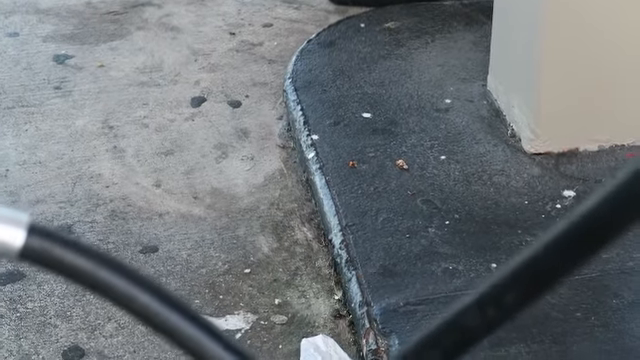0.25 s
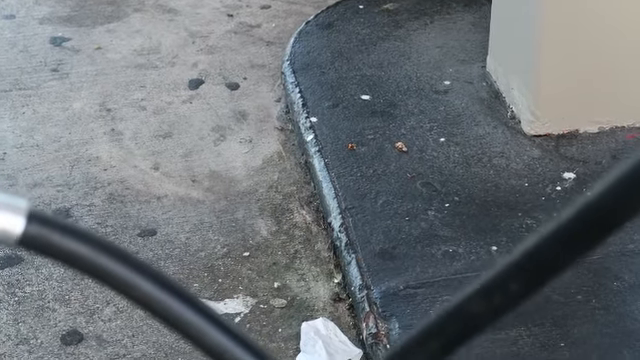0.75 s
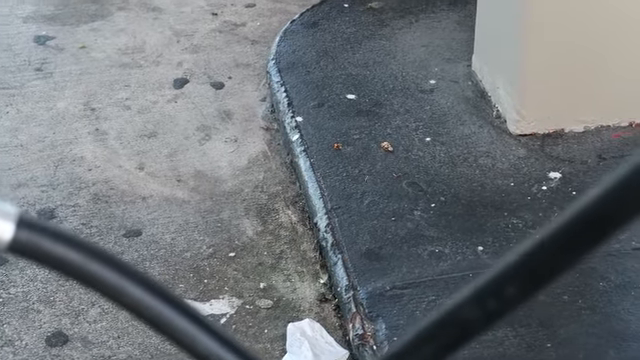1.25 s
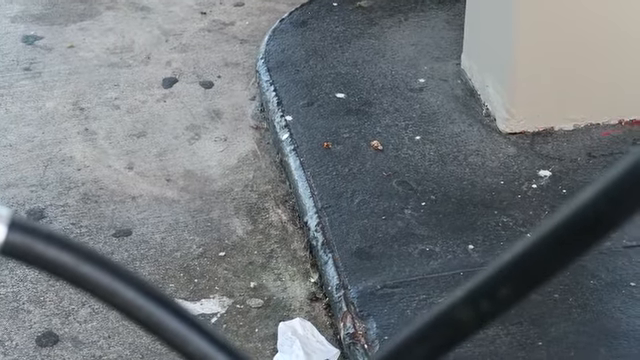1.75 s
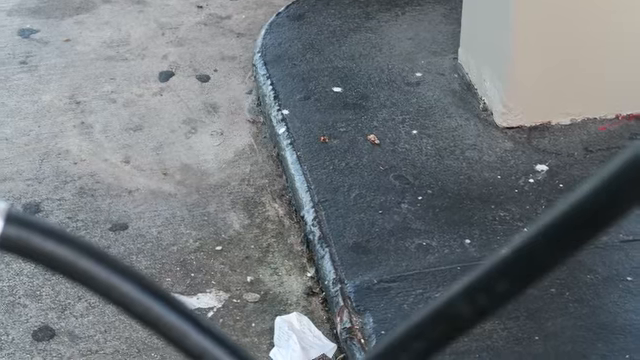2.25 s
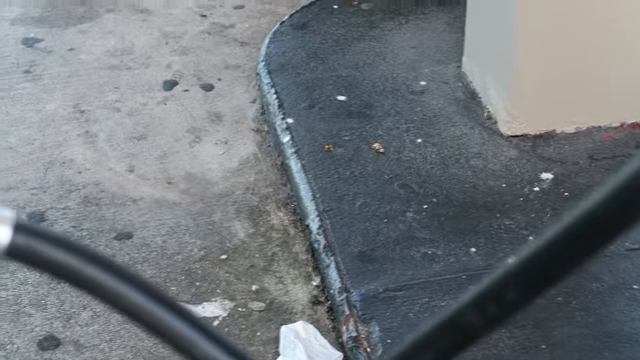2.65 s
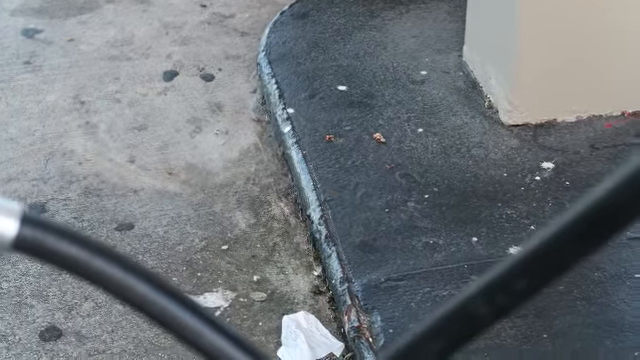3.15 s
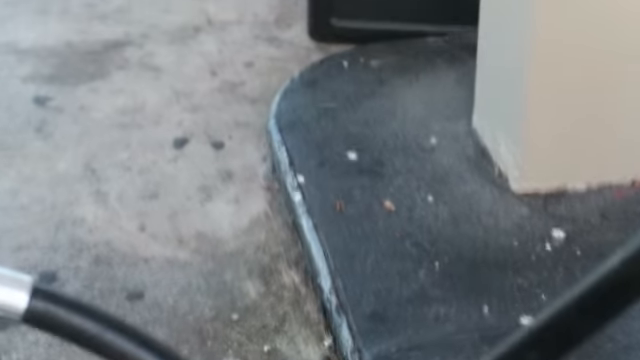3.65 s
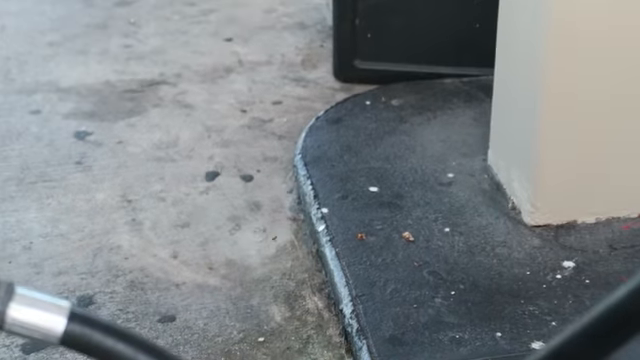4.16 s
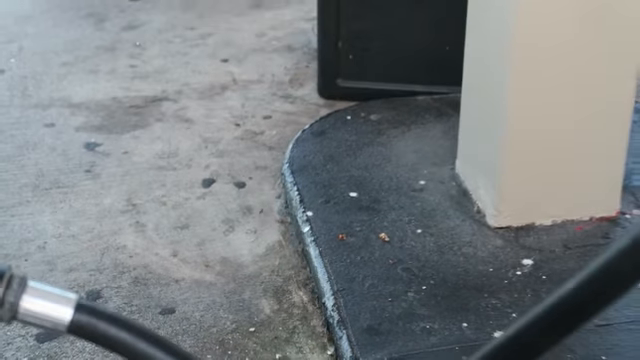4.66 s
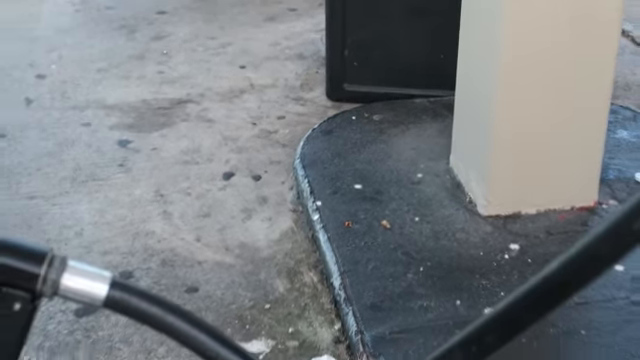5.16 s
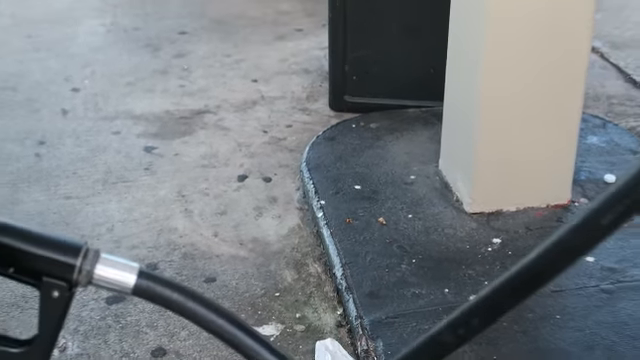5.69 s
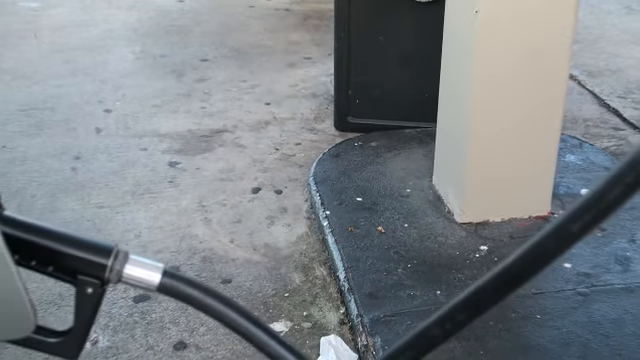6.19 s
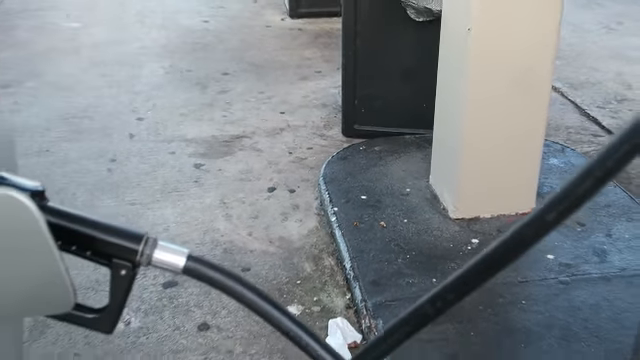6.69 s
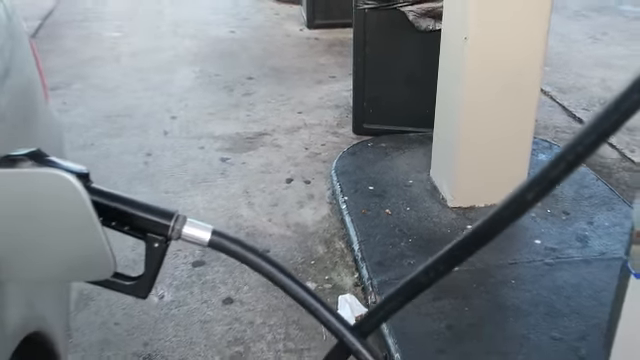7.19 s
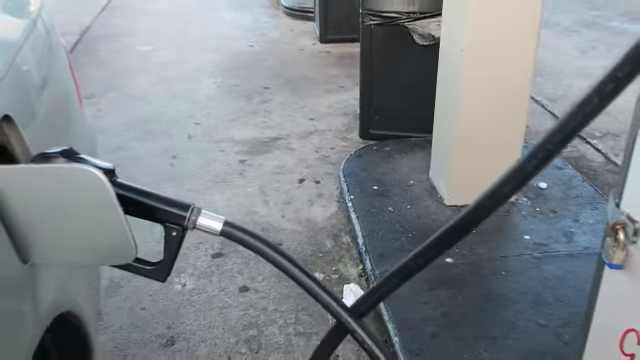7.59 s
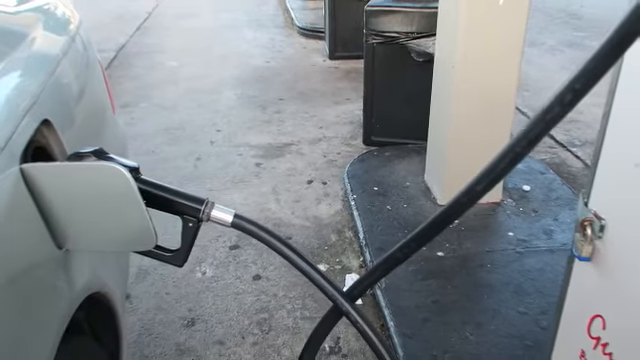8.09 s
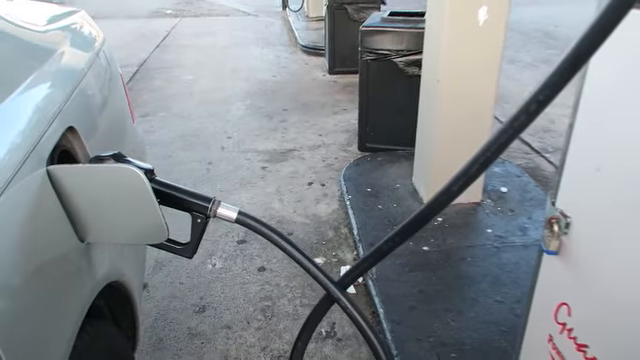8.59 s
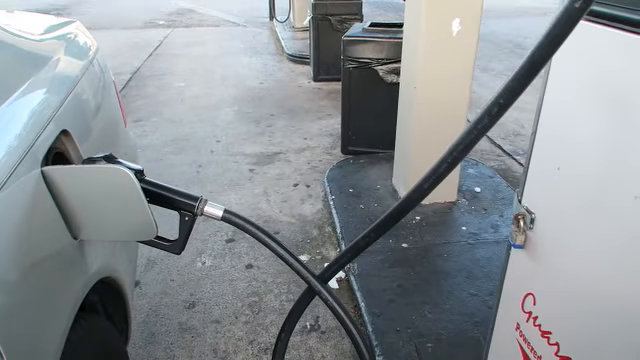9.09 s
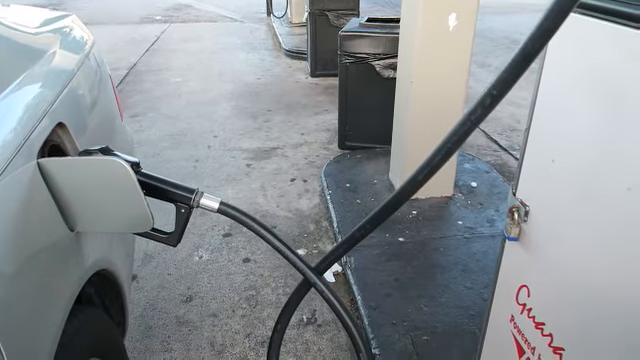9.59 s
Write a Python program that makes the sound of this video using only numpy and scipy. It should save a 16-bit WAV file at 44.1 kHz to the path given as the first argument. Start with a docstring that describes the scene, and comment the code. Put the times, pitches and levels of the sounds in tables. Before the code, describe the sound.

Broad, dull rush of flow and road noise, deep rumble and wavering engine hum; a faint early squeak, later a sudden close metal clack.

```python
"""Fuel runs into a car on a forecourt: a broad rush of flow and road traffic, made of flickering noise bands.
Over it a thin top band of noise flickers, below it lie a deep rumble and roar and faint gliding sine hums.
An engine drones on three multiples of its cycle rate, which drops twice and creeps up again.
A faint blurred squeak, a trembling tone, comes early on.
Once a small metal part clicks, rattles and rings: bursts of noise and decaying modes, scattered nearby."""
import sys
import numpy as np
from scipy import signal
from scipy.fft import rfft, irfft, next_fast_len
from scipy.io import wavfile
from scipy.ndimage import uniform_filter1d

SR = 44100
rng = np.random.default_rng(int(sys.argv[2]) if len(sys.argv) > 2 else 0)


def materialize(psi):
    """Save the field psi as 16-bit PCM at rate SR to the path in sys.argv[1].

    A 1-D psi becomes a single channel; in a 2-D psi each row is a channel.
    """
    bounded = np.clip(np.atleast_2d(psi).T, -1, 1)
    quanta = np.round(bounded * 32767).astype(np.int16)
    wavfile.write(sys.argv[1], SR, quanta)


N = 433944

# Swells and ebbs of the rush. Each row: time in seconds, level in dB.
RUSH_LEVELS = [(0, -22.5), (.62, -20), (1.2, -22.5), (1.8, -21), (3.1, -20), (3.72, -23), (4.1, -20.5),
               (4.4, -21.5), (4.62, -18), (4.84, -20.5), (5.06, -20), (5.7, -23), (6.3, -22.5), (6.6, -24),
               (6.85, -22), (7.28, -24), (7.5, -21.5), (7.7, -26), (8.0, -23), (8.58, -23), (8.85, -24.5),
               (9.25, -26), (9.46, -23.5), (9.84, -24.5)]
# Treble ahead of the swells and dips. Each row: time in seconds, hiss level in dB, top level in dB.
TREBLE_LEVELS = [(0, -41.5, -55.5), (.6, -38, -50), (2.4, -37.5, -49), (3.2, -38.5, -55), (3.6, -40, -62.5),
                 (5.1, -40.5, -62), (5.8, -40.5, -68), (7.4, -40.5, -63.5), (8.2, -43.5, -69.5),
                 (8.42, -43.5, -65), (8.53, -38, -52), (8.63, -44, -73), (8.75, -40.5, -55),
                 (8.86, -45, -72), (9.84, -42, -64)]
RUSH_MEAN_DB = -21.5


def undb(db):
    """Decibels to an amplitude factor."""
    return 10 ** (np.asarray(db) / 20)


def curves(table):
    """Columns of a table, joined by straight lines in time."""
    seconds, *columns = np.transpose(table)
    return [np.interp(np.arange(N) / SR, seconds, column) for column in columns]


def walk(rate):
    """Random levels held 1 / rate seconds and smoothed twice over that time; spread near 1."""
    hold = int(SR / rate)
    steps = np.repeat(rng.standard_normal(N // hold + 1), hold)
    return 1.336 * uniform_filter1d(uniform_filter1d(steps, hold), hold)[:N]


def on_log(hz, table):
    """A table of frequency and value, read on a log-frequency axis."""
    table_hz, values = np.transpose(table)
    return np.interp(np.log(hz), np.log(table_hz), values)


def wash(spectrum, db, flicker_db, flicker_rate):
    """Stereo noise of a given colour and level; each half-octave band flickers on its own."""
    # Stereo width. Each row: frequency in Hz, side level minus mid level in dB.
    width = [(30, -30), (60, -37.5), (91, -33.5), (140, -32.5), (210, -17), (320, -16.5), (490, -20),
             (740, -17.5), (1710, -15.5), (3000, -11.5), (6000, -3)]
    size = next_fast_len(N)
    hz = np.maximum(np.arange(size // 2 + 1) * SR / size, 1)
    inside = (hz >= spectrum[0][0]) & (hz <= spectrum[-1][0])
    mid, side = rfft(rng.standard_normal((2, size))) * undb(on_log(hz, spectrum)) * inside
    pair = np.array([mid, side * undb(on_log(hz, width))])
    half_octaves = 2 * np.log2(hz / spectrum[0][0])
    out = 0
    for k in range(int(half_octaves[inside].max()) + 2):
        # triangular bands that overlap and sum to one
        share = np.clip(1 - abs(half_octaves - k), 0, 1)
        band = irfft(pair * share, size)[:, :N]
        out = out + band * undb(flicker_db * walk(flicker_rate))
    # the level is the RMS of the mid signal
    out = out * undb(db) / np.sqrt(np.mean(out[0] ** 2))
    return np.array([out[0] + out[1], out[0] - out[1]])


def rumble_and_roar():
    """The low bed of the place: two bands of noise, each with a slow level and a flicker."""
    # Colours of the two bands. Each row: frequency in Hz, relative density in dB per Hz.
    rumble_colour = [(18, -43), (30, -8.5), (57, 1.5), (86, 3), (172, 1), (260, -7.5), (340, -32.5),
                     (570, -120)]
    roar_colour = [(130, -28.5), (200, -2), (300, -5.5), (450, -2.5), (600, -6), (800, -33)]
    # Slow levels. Each row: time in seconds, rumble level in dB, roar level in dB.
    low_levels = [(0, -20.5, -23.5), (2.1, -19, -22.5), (3.1, -20, -22), (3.6, -21, -24.5),
                  (4.05, -19, -21.5), (4.8, -21.5, -23), (6.5, -23, -25), (7.0, -18.5, -21),
                  (7.26, -22, -25.5), (7.48, -20.5, -19), (7.7, -22.5, -24), (8.2, -21, -22.5),
                  (8.8, -22.5, -24.5), (9.84, -20, -24.5)]
    rumble_db, roar_db = curves(low_levels)
    return wash(rumble_colour, rumble_db, 0.24, 4.1) + wash(roar_colour, roar_db, 0.92, 5.6)


def hums():
    """Each faint tone swells in, glides, wavers in pitch and level, and fades."""
    # Each row: start in seconds, end in seconds, first pitch in Hz, last pitch in Hz,
    # RMS level in dB ahead of the waver. A start below zero is a hum already under way.
    hum_rows = [(-1.5, 5.2, 69.1, 69.0, -28), (-.8, 2.7, 138.5, 138, -34), (.4, 2.1, 333, 329, -34),
                (1.85, 2.35, 462, 458, -31), (2.6, 3.45, 440, 448, -29), (3.2, 4.3, 132, 133, -29),
                (4.2, 5.1, 98, 97, -29), (4.3, 5.2, 193, 196, -33), (4.0, 5.1, 292, 295, -35),
                (6.4, 7.4, 275, 276, -37), (8.7, 10.1, 72, 76, -28), (2.7, 3.95, 121.5, 122.5, -27),
                (4.6, 5.0, 127, 127, -25)]
    t, out = np.arange(N) / SR, 0
    for start, end, first_hz, last_hz, db in hum_rows:
        share = np.clip((t - start) / (end - start), 0, 1)
        hz = (first_hz + (last_hz - first_hz) * share) * (1 + 0.004 * walk(9))
        phase = 2 * np.pi * np.cumsum(hz) / SR
        swell = (2.3 * np.sin(np.pi * share)).clip(0, 1)
        out = out + np.sqrt(2) * swell * undb(db + 2.5 * walk(8)) * np.sin(phase)
    return out


def squeak():
    """A gliding tone, blurred because its pitch and strength tremble quickly."""
    # Each row: time in seconds, pitch in Hz, RMS level in dB, both ahead of the tremble.
    glide = [(.43, 4020, -75), (.46, 4070, -49), (.5, 4180, -51), (.515, 3800, -70), (.545, 3630, -49),
             (.58, 3600, -51), (.61, 3580, -47), (.645, 3500, -44), (.685, 3380, -49), (.70, 3430, -42),
             (.712, 3550, -39), (.725, 3630, -43), (.74, 3650, -48), (.77, 3700, -90)]
    blur_hz = 28
    t = np.arange(N) / SR
    hz, db = curves(glide)
    phase = 2 * np.pi * np.cumsum(hz + blur_hz * walk(150)) / SR
    on = (t > glide[0][0]) & (t < glide[-1][0])
    return np.sqrt(2) * on * undb(db + 1.5 * walk(80)) * np.sin(phase)


def drone():
    """Three multiples of the engine cycle; speed wavers a little and each tone dips in strength."""
    # Engine speed ahead of the waver. Each row: time in seconds, cycle rate in Hz.
    speed = [(0, 59.5), (2.5, 59.26), (2.95, 56.7), (4.1, 58.62), (5.8, 58.47), (5.97, 55.42), (7.3, 55.3),
             (9.5, 56.8), (9.84, 57.9)]
    # First, second and third multiple of the cycle. Each row: time in seconds, RMS level in dB ahead of the dips.
    first_levels = [(0, -38), (4.9, -35), (5.1, -21.5), (5.9, -28.5), (7.28, -33), (7.45, -17.5),
                    (7.85, -18.5), (8.7, -23.5), (9.0, -36), (9.3, -23), (9.84, -17.5)]
    second_levels = [(0, -35), (2.7, -43.5), (2.92, -24), (3.42, -17.5), (3.7, -25), (3.9, -20),
                     (4.05, -27), (4.26, -18), (4.6, -27), (4.75, -20.5), (4.92, -29), (5.08, -14.5),
                     (5.8, -16), (6.06, -13.5), (6.5, -16.5), (7.14, -15), (7.38, -17.5), (7.5, -23),
                     (7.62, -15.5), (7.76, -21), (8.2, -15.5), (8.8, -19), (8.95, -13), (9.55, -16),
                     (9.68, -21.5), (9.84, -32)]
    third_levels = [(0, -38), (3, -39.5), (3.6, -35.5), (5.3, -30.5), (5.8, -38), (6.7, -36), (7.0, -25),
                    (7.3, -33.5), (7.8, -28.5), (8.2, -26.5), (8.58, -19), (8.85, -34.5), (9.84, -34.5)]
    # the weaker the tone below the steady level, the deeper it dips
    dip_db, extra_dip_db_per_db, steady_db = 2.2, .35, -15

    cycle_hz = curves(speed)[0] * (1 + 0.0031 * walk(12))
    turn = 2 * np.pi * np.cumsum(cycle_hz) / SR
    out = 0
    for multiple, table in enumerate([first_levels, second_levels, third_levels], 1):
        db, = curves(table)
        depth_db = dip_db + extra_dip_db_per_db * np.clip(steady_db - db, 0, 9)
        db = db - depth_db * abs(walk(12))
        out = out + np.sqrt(2) * undb(db) * np.sin(multiple * turn)
    return out


def click():
    """Each bounce is a crack that rings the modes; car and pillar scatter it differently to each side."""
    # The click and its bounces. Each row: time in seconds, peak level of the direct sound in dB.
    bounces = [(7.6577, -2.5), (7.6635, -17), (7.6685, -18), (7.679, -19), (7.684, -17), (7.692, -29),
               (7.7005, -29), (7.709, -31), (7.715, -28), (7.727, -35)]
    # Modes of the metal part, each varied a little at every bounce.
    # Each row: frequency in Hz, relative level in dB, time to decay by 60 dB in seconds.
    modes = [(2100, -8, .012), (2740, -3, .014), (3150, -12, .01), (3810, 1, .017), (4010, -14, .1),
             (4390, -3, .016), (5000, -5, .01), (5430, -3, .012), (6050, -1, .011), (7500, -6, .009),
             (8380, -13, .01), (9160, -14, .007), (11400, -24, .025), (12300, -14, .008)]
    t, out = np.arange(SR // 3) / SR, np.zeros((2, N + SR))
    crack_band = signal.butter(2, [2000, 8000], "bandpass", fs=SR, output="sos")
    dull = signal.butter(8, 7600, fs=SR, output="sos")
    for start, db in bounces:
        below_first_db = db - bounces[0][1]
        chance = rng.standard_normal((len(modes), 2))
        ring = 0
        for (hz, mode_db, t60), (level_chance, pitch_chance) in zip(modes, chance):
            tone = np.sin(2 * np.pi * hz * (1 + .005 * pitch_chance) * t)
            ring = ring + undb(mode_db + level_chance) * tone * undb(-60 * t / t60)
        # weak bounces ring more than they crack
        crack = undb(2 + .25 * below_first_db) * rng.standard_normal(len(t)) * undb(-60 * t / .009)
        direct = ring + signal.sosfilt(crack_band, crack)
        # the contact takes a moment to build, longer for the weak bounces
        build_s = .0003 * undb(-.5 * below_first_db)
        direct = direct * (1 - np.exp(-t / build_s))
        direct = direct * undb(db) / abs(direct).max()
        # dense early scatter, then a weaker, duller tail
        early = undb(-25) * rng.standard_normal((2, len(t))) * undb(-60 * t / .03)
        late = undb(-36) * rng.standard_normal((2, len(t))) * undb(-60 * t / .24)
        late = signal.sosfilt(dull, late)
        scatter = signal.fftconvolve(direct[None], early + late, axes=1)[:, :len(t)]
        i = int(start * SR)
        out[:, i:i + len(t)] += direct + scatter
    # the part sits a little to the left: the right microphone hears it one sample later
    return np.array([out[0, :N], np.roll(out[1], 1)[:N]])


def thin_top():
    """A thin top band of noise that follows the rush and flickers, dipping quickly at random."""
    # Each row: frequency in Hz, relative density in dB per Hz.
    top_colour = [(3500, -14), (4500, -1), (5300, 0), (6200, -5), (7200, -14), (8400, -42)]
    follow = 1  # dB per dB of swell
    dip_db, dip_rate = 8, 26  # dB per unit of the random walk, changes a second
    swell_db = curves(RUSH_LEVELS)[0] - RUSH_MEAN_DB
    top_db = curves(TREBLE_LEVELS)[1] + follow * swell_db
    top_db = top_db - dip_db * np.clip(walk(dip_rate), 0, 3)
    return wash(top_colour, top_db, 2.0, 22)


def flow_rush():
    """The rush of flow and traffic: three bands of noise, the hiss following the swells of the rush."""
    # Colours of the three bands. Each row: frequency in Hz, relative density in dB per Hz.
    rush_colour = [(450, -33.5), (700, -3), (1050, -3.5), (1200, -7), (1500, -10.5), (1900, -34.5)]
    spray_colour = [(1100, -29.5), (1500, -0.5), (1900, -2), (2600, -11), (3300, -22.5)]
    hiss_colour = [(1800, -10), (2600, -1.5), (3500, -6.5), (4300, -13), (4900, -17.5), (5500, -40.5)]
    # The upper part of the rush surges on its own. Each row: time in seconds, level in dB.
    spray_levels = [(0.0, -32), (0.33, -28), (0.57, -27), (1.18, -29.5), (1.48, -27.5), (3.12, -28.5),
                    (3.67, -30.5), (4.66, -28), (5.12, -28), (5.84, -32.5), (6.19, -30), (6.49, -33),
                    (6.88, -31), (8.22, -32.5), (8.63, -31.5), (8.99, -33.5), (9.84, -33)]
    hiss_follow = 0.72  # dB per dB of swell

    rush_db, = curves(RUSH_LEVELS)
    spray_db, = curves(spray_levels)
    hiss_db = curves(TREBLE_LEVELS)[0] + hiss_follow * (rush_db - RUSH_MEAN_DB)
    out = wash(rush_colour, rush_db, .9, 8)
    out = out + wash(spray_colour, spray_db, 1.5, 9)
    return out + wash(hiss_colour, hiss_db, 1.9, 17)


def scene():
    """The low bed, tones, click, thin top and rush; hums, squeak and drone are the same on both sides."""
    return rumble_and_roar() + hums() + squeak() + drone() + click() + thin_top() + flow_rush()


def record(dry):
    """The recorder rounds the loudest peaks and cuts the top."""
    rounded = np.tanh(1.138 * dry) / 1.069
    top_cut = signal.ellip(8, .2, 70, 15600, fs=SR, output="sos")  # low-pass edge in Hz
    return signal.sosfilt(top_cut, rounded)


dry = scene()
out = record(dry)
materialize(out)
```